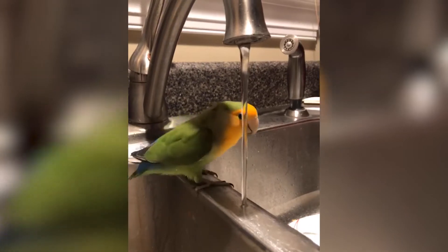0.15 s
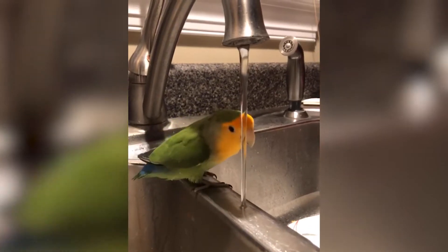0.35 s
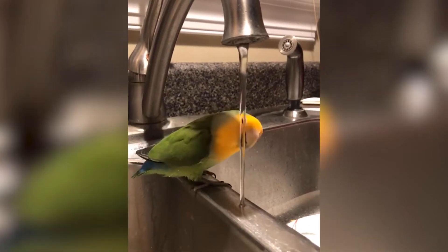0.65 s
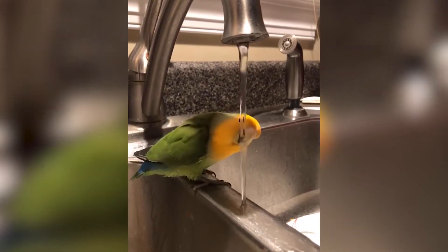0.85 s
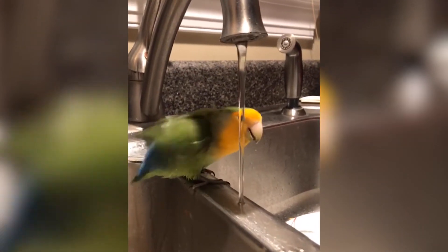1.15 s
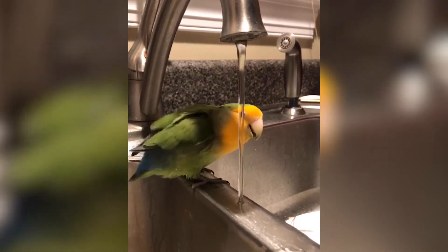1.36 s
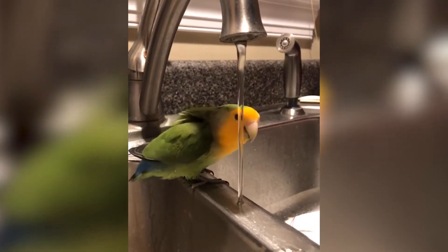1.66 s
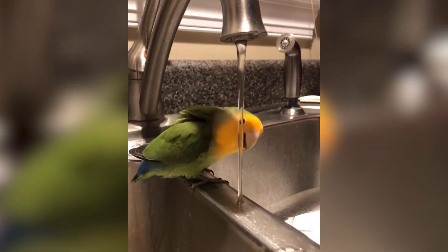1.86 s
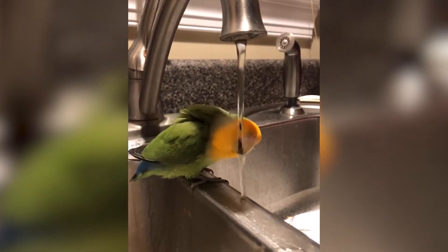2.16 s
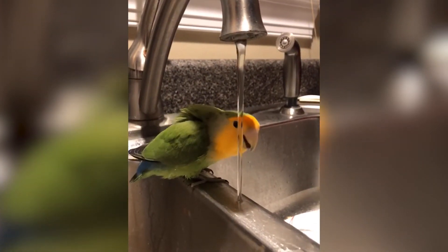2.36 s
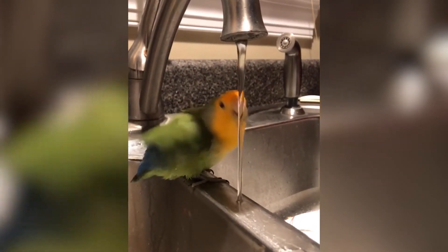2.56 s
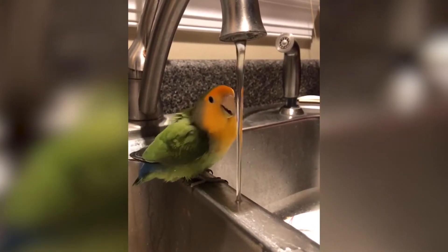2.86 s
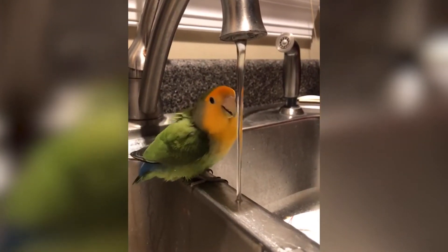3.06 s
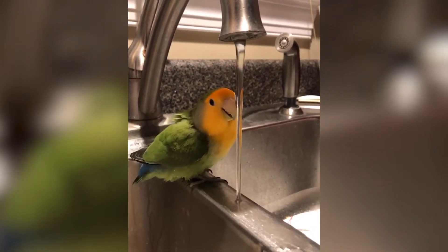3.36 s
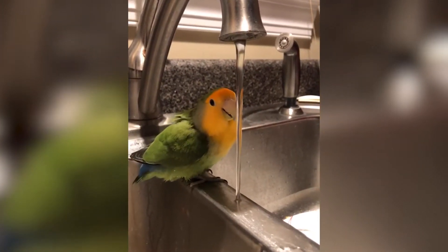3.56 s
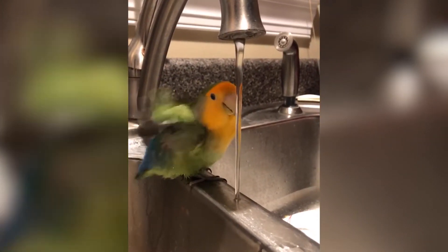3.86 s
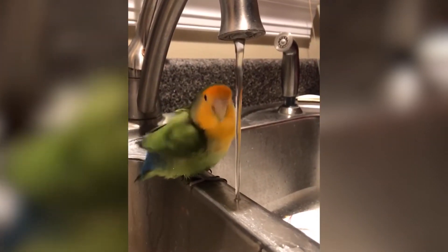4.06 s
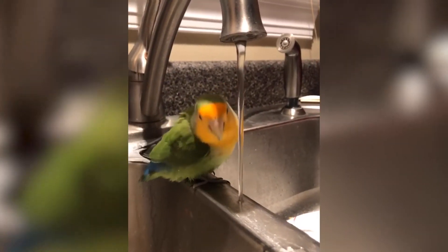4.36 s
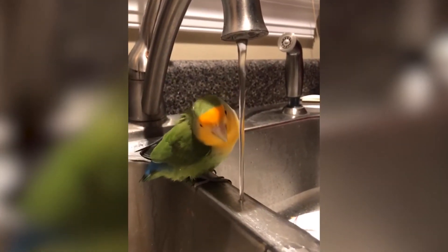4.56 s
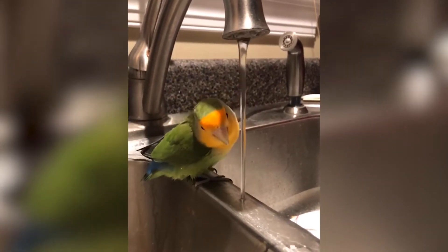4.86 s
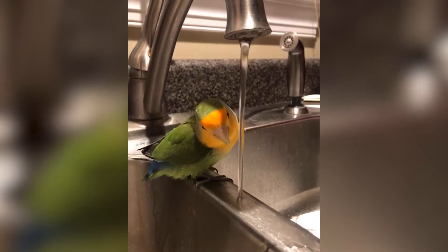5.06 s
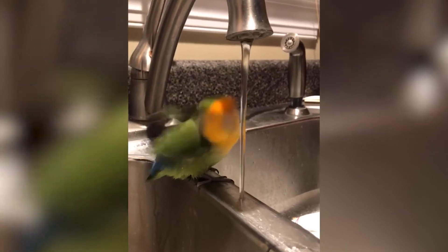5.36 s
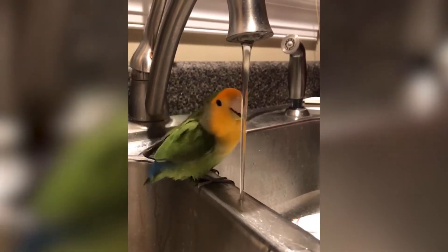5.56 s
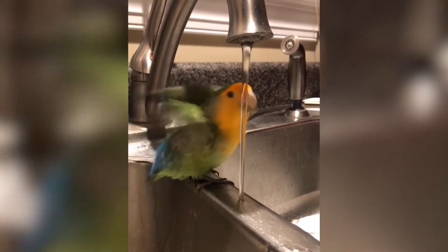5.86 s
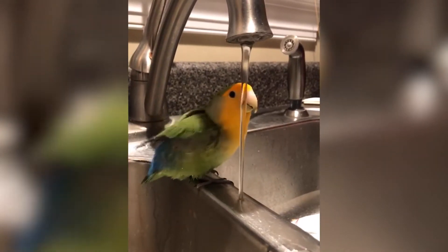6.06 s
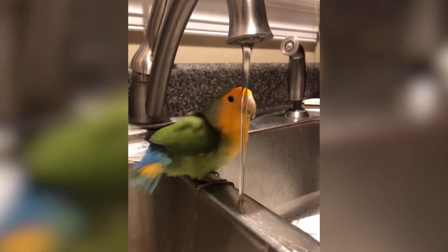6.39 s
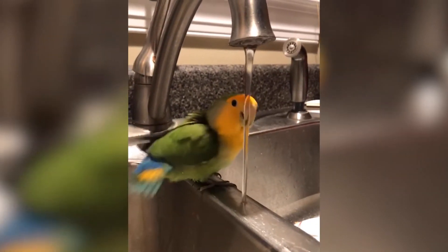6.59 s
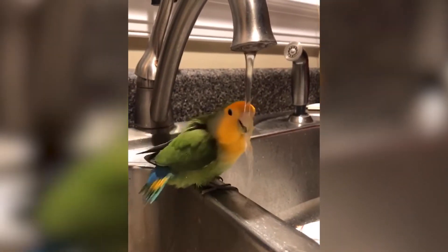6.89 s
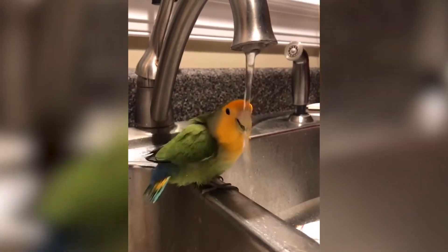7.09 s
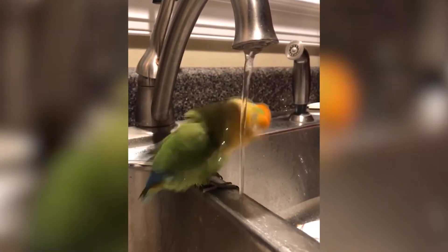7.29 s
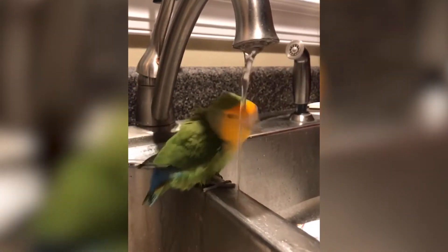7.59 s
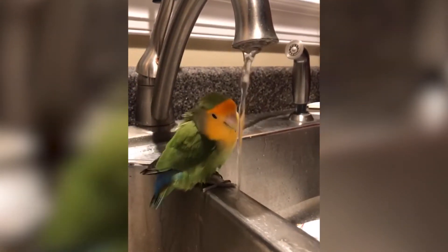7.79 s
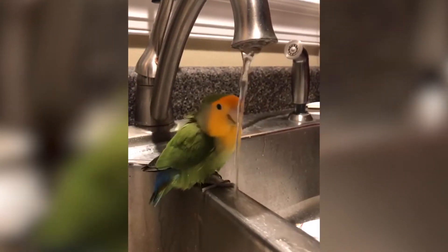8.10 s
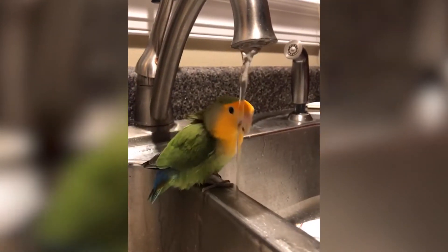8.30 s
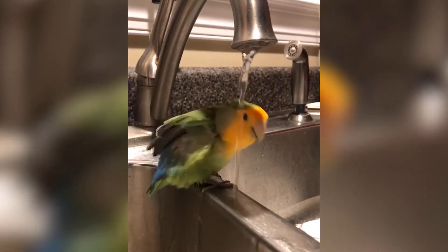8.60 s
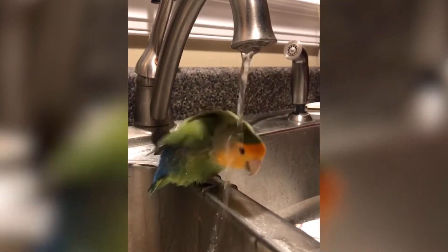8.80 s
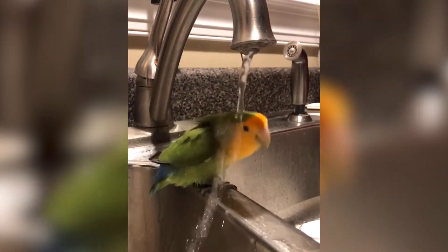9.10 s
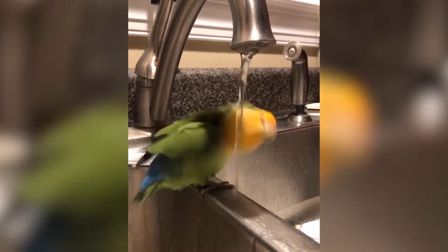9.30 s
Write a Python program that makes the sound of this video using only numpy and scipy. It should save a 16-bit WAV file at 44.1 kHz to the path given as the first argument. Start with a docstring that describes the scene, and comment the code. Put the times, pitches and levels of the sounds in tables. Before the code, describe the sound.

Tap water runs onto a steel kitchen sink, heard as a low, muffled drumming with a faint steady hiss. As the stream is broken up, irregular deep thumps land, first one at a time and then in a busy run, with brief swells of hiss on some loud ones. A short lull and a last few thumps follow. A few tiny ticks and a momentary dropout near the end interrupt it.

```python
"""A thin stream from a kitchen tap drums on a steel sink, dull and deep, under a faint hiss.
A small bird breaks up the stream, so lumps of water land as thumps: high part first, bass trailing.
The thumps start sparse, then crowd together from about 4 to 7 seconds; the hiss swells on some loud ones.
After a lull a few more land. Near the end, the sound drops out for an instant.
Four tiny ticks cut through along the way."""
import sys
import numpy as np
from scipy import signal
from scipy.fft import rfft, irfft, next_fast_len
from scipy.io import wavfile
from scipy.ndimage import uniform_filter1d, map_coordinates

SR = 44100
rng = np.random.default_rng(int(sys.argv[2]) if len(sys.argv) > 2 else 0)


def put_to_file(sound):
    """Save the sound as 16-bit audio at rate SR, in the file named by the first command-line argument."""
    columns = np.atleast_2d(sound).T  # one column per channel
    safe = np.clip(columns, -1, 1)
    whole_steps = np.round(safe * 32767)
    wavfile.write(sys.argv[1], SR, whole_steps.astype(np.int16))


N = 416304
FFT_SIZE = next_fast_len(N + SR // 2)

# lumps of water landing: start_s, boom_db, body_db, knock_db, softness_db_per_octave
WATER_LUMPS = [(.012, -19, -31.5, -45, 22), (.025, -38, -49, -50.5, -2), (0.4, -45.5, -51.5, -53, -0.5),
               (0.705, -39, -36.5, -62, 15), (.939, -27, -52, -61, 11), (1.202, -21, -44.5, -55, 16),
               (1.288, -48.5, -31, -44, 11), (1.66, -9.5, -19.5, -37, 16), (1.707, -36.5, -43.5, -70, 10),
               (2.085, -12, -19.5, -29.5, 7), (2.944, -9, -14.5, -18.5, 15.5), (3.343, -47, -44, -54.5, 1),
               (3.423, -46, -42, -54, 10), (3.881, -14.5, -28, -25, 19.5), (4.194, -15.5, -30.5, -45, 14.5),
               (4.218, -9, -14, -18, 15), (4.247, -10, -25.5, -37.5, 10.5), (4.304, -29.5, -32.5, -37, 8),
               (4.391, -58.5, -46.5, -52, 6), (4.436, -48, -48.5, -55, 4), (4.499, -33, -44.5, -55, 10.5),
               (4.613, -16.5, -24, -42.5, 2.5), (4.832, -16, -13.5, -18.5, 24),
               (4.853, -24.5, -15, -23, 16), (4.880, -31, -41, -52.5, 8), (5.1, -21.5, -18.5, -29.5, 38),
               (5.13, -30.5, -24.5, -42.5, 8), (5.214, -24.5, -49, -70, 8), (5.348, -18, -16, -22, 21.5),
               (5.485, -16.5, -15.5, -29.5, 16.5), (5.659, -9, -13.5, -26.5, 25),
               (5.785, -23.5, -19, -35, 34), (6.053, -25, -43.5, -52.5, 7), (6.304, -40.5, -42.5, -54, 16),
               (6.318, -11, -13, -26.5, 10), (6.407, -19, -28.5, -46, 22), (6.435, -11.5, -20.5, -26, 19),
               (6.531, -15, -46, -71, 14), (6.561, -15.5, -30.5, -48.5, 1), (6.592, -29, -44.5, -46, 11),
               (6.682, -41.5, -40.5, -51.5, 6), (6.702, -45, -41.5, -58, 14), (6.720, -44, -40, -54, 17),
               (6.747, -19, -18.5, -24, 18.5), (7.027, -20.5, -30, -41, 3), (7.095, -38.5, -36.5, -47, 8),
               (7.133, -20.5, -26.5, -43.5, 12), (7.177, -40, -41.5, -54, 12), (7.205, -44, -48, -59, 13.5),
               (8.155, -11, -25, -25, 19.5), (8.263, -28, -39, -48.5, 18), (8.282, -9, -21, -28.5, 13),
               (8.367, -39, -41, -40, 11.5), (8.490, -39, -48.5, -62, 16), (8.519, -26, -41, -41, 28),
               (9.102, -31, -33.5, -72, 14)]
# a thump's boom, body, knock, ring and snap, from low to high: pitch_hz, width_octaves
THUMP_PARTS = [(46, 0.63), (140, 0.48), (310, 0.55), (540, 0.54), (1050, 0.36)]
# how the sink answers a blow: pitch_hz, relative_db
SINK_TONE = [(10, -15), (22, -4), (40, -1.5), (100, -4.5), (300, -20.5), (520, -36.5), (680, -48),
             (1200, -66), (4000, -89)]


def thumps():
    """Each lump of water shakes the sink; a softer landing loses more of the high notes."""
    start_s, boom_db, body_db, knock_db, softness = np.transpose(WATER_LUMPS)
    knock_hz = THUMP_PARTS[2][0]
    ring_db, snap_db = [knock_db - softness * np.log2(hz / knock_hz) for hz, _ in THUMP_PARTS[3:]]
    snap_db -= 0.63 * (-18.5 - knock_db)  # knocks weaker than -18.5 dB lose extra snap
    grid_hz = np.fft.rfftfreq(FFT_SIZE, 1 / SR)
    sound = np.zeros(N)
    for (pitch_hz, width), db in zip(THUMP_PARTS, [boom_db, body_db, knock_db, ring_db, snap_db]):
        def part(hz):
            octaves_away = np.log2((hz + 1) / pitch_hz)
            return tone_gain(SINK_TONE, hz) * np.exp(-.5 * (octaves_away / width) ** 2)
        blows = filtered(pulses(start_s, db), lambda hz: part(hz) * steel_delay(hz))
        sound += blows / np.mean(part(grid_hz))  # db is the peak before the steel smears it
    return sound


def steel_delay(hz):
    """Steel carries high notes faster: each pitch arrives 1.3 of its own cycles late."""
    return np.exp(-2j * np.pi * 1.3 * np.log((hz + 1) / 125))


# the strength of the stream over time: time_s, rumble_db, patter_db
STREAM_LEVELS = [(0.0, -28, -49.5), (0.89, -34.5, -51.5), (2.18, -32.5, -52), (2.6, -35, -52),
                 (2.97, -34, -51.5), (4.15, -34, -52), (4.47, -37.5, -46.5), (4.94, -29, -52),
                 (5.55, -39.5, -48), (5.97, -37.5, -52), (6.26, -39.5, -46.5), (6.54, -29.5, -43.5),
                 (7.44, -36.5, -52), (7.99, -33.5, -50.5), (8.18, -35.5, -49.5), (9.44, -39.5, -52)]
# the tone of the shaking sink and of the small drops: pitch_hz, relative_db
RUMBLE_TONE = [(8, -26), (18, -5.5), (32, 6.5), (43, 1.5), (58, -3), (75, -15.5), (110, -27), (200, -72),
               (400, -140)]
PATTER_TONE = [(40, -27.5), (70, -2), (110, -7), (150, -13.5), (230, -27), (350, -36), (550, -43.5),
               (900, -56.5), (2000, -140)]


def stream():
    """The stream makes the sink rumble and small drops patter on it; both swell after each lump."""
    rumble = unit(amp(1.9 * wobble(rate_hz=7.1)) * noise(RUMBLE_TONE))
    when, size = rng.random((500, 2)).T
    drops = np.bincount((when * N).astype(int), amp(-3 * np.log(size)), N)  # many small, few large
    taps = unit(filtered(drops, lambda hz: tone_gain(PATTER_TONE, hz) * steel_delay(hz)))
    patter = unit(0.73 * taps + noise(PATTER_TONE))
    time_s, rumble_db, patter_db = np.transpose(STREAM_LEVELS)
    start_s, boom_db, body_db, *_ = np.transpose(WATER_LUMPS)
    t = np.arange(N) / SR
    rumble_gain = amp(np.interp(t, time_s, rumble_db)) + slosh(start_s, boom_db - 21, fade_s=0.057)
    patter_gain = amp(np.interp(t, time_s, patter_db)) + slosh(start_s, body_db - 35.5, fade_s=0.03)
    return rumble_gain * rumble + patter_gain * patter


def slosh(start_s, level_db, fade_s, delay_s=0.022):
    """Water sloshes just after each lump: a level that jumps up and fades away."""
    return uniform_filter1d(fading(pulses(start_s + delay_s, level_db), fade_s), size=600)


# sudden steps in air pressure: start_s, level_db
PRESSURE_STEPS = [(.755, -44.5), (2.2412, -41), (6.4184, -51), (9.2042, -52)]


def ticks():
    """Each tick is a slightly rounded step in pressure that leaks away in a few milliseconds."""
    start_s, level_db = np.transpose(PRESSURE_STEPS)
    steps = fading(pulses(start_s, level_db), fade_s=0.003)
    return filtered(steps, lambda hz: 1 / (1 + (hz / 11000) ** 4))


# the tone of the faint hiss and of its swells: pitch_hz, relative_db
HISS_TONE = [(200, -20), (500, 0), (1000, -1), (2300, -4.5), (6700, -11), (11500, -18), (12050, -20),
             (12200, -32), (14000, -33)]
SWELL_TONE = [(300, -11), (700, -0.5), (1200, -5.5), (2400, -6.5), (4200, -8.5), (7000, -13), (10000, -18),
              (12500, -23.5), (14000, -29)]
# moments when the hiss swells: start_s, end_s, level_db
HISS_SWELLS = [(2.947, 3.003, -64), (4.25, 4.309, -63), (5.659, 5.716, -64.5), (6.318, 6.374, -64),
               (6.437, 6.495, -63.5), (6.56, 6.683, -64), (9.112, 9.147, -78)]


def hiss():
    """A faint, steady hiss with short swells that rise, hold and fall."""
    swell_gain = np.zeros(N)
    for start_s, end_s, level_db in HISS_SWELLS:
        swell_gain[round(start_s * SR):round(end_s * SR)] = amp(level_db)
    swell_gain = uniform_filter1d(swell_gain, size=200)
    steady = amp(-76.5 + 0.58 * wobble(rate_hz=24)) * noise(HISS_TONE)
    return steady + swell_gain * noise(SWELL_TONE)


def amp(db):
    """Turn decibels into a multiplier."""
    return 10 ** (np.asarray(db) / 20)


def unit(x):
    """Scale a sound to an average power of 1."""
    return x / np.sqrt(np.mean(x ** 2) + 1e-20)


def pulses(start_s, level_db):
    """One sharp push at each start time."""
    return np.bincount(np.round(start_s * SR).astype(int), amp(level_db), N)


def fading(pushes, fade_s):
    """Give each push a tail that dies away."""
    return signal.lfilter([1], [1, -np.exp(-1 / (fade_s * SR))], pushes)


def tone_gain(tone, hz):
    """Read a tone table's multiplier at any pitch."""
    pitch_hz, db = np.transpose(tone)
    return amp(np.interp(np.log(hz + 1), np.log(pitch_hz + 1), db))


def wobble(rate_hz):
    """A smooth curve through rate_hz random points a second."""
    points = rng.standard_normal(int(N * rate_hz / SR) + 4)
    return map_coordinates(points, [np.arange(N) * rate_hz / SR])


def filtered(x, response):
    """Scale and delay each pitch in x by response(hz)."""
    hz = np.fft.rfftfreq(FFT_SIZE, 1 / SR)
    return irfft(rfft(x, FFT_SIZE) * response(hz), FFT_SIZE)[..., :N]


def noise(tone):
    """Noise shaped by a tone table."""
    return unit(filtered(rng.standard_normal(N), lambda hz: tone_gain(tone, hz)))


def scene():
    """Mix the layers; all but the ticks start softly, cut out once and fade back."""
    dropout_s, return_s = 9.2066, 0.025
    since_s = np.arange(N) / SR - dropout_s
    cut_out = np.clip(-since_s * 500, 0, 1)
    fade_back = np.clip(since_s / return_s, 0, 1) ** 2
    level = np.where(since_s < 0, cut_out, fade_back)
    level[:200] *= np.arange(200) / 200
    return ((thumps() + stream() + hiss()) * level + ticks())[None]


def record(dry, top_hz=14000):
    """Remove every pitch above top_hz."""
    return filtered(dry, lambda hz: hz < top_hz)


dry = scene()
out = record(dry)
put_to_file(out)
```